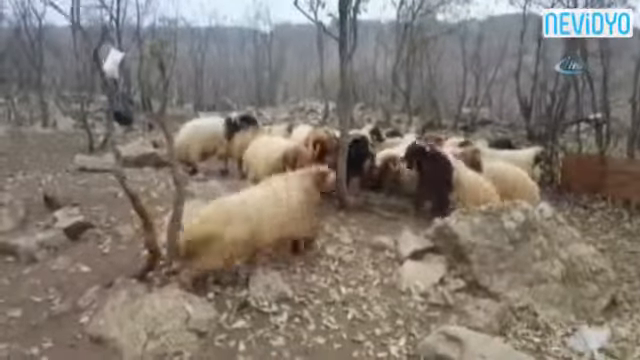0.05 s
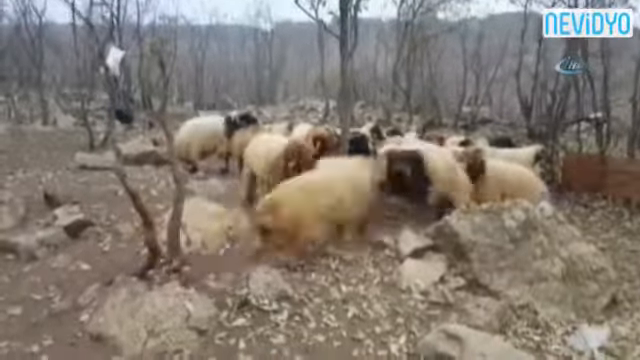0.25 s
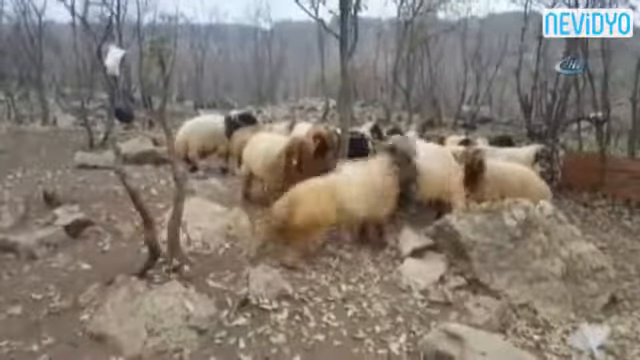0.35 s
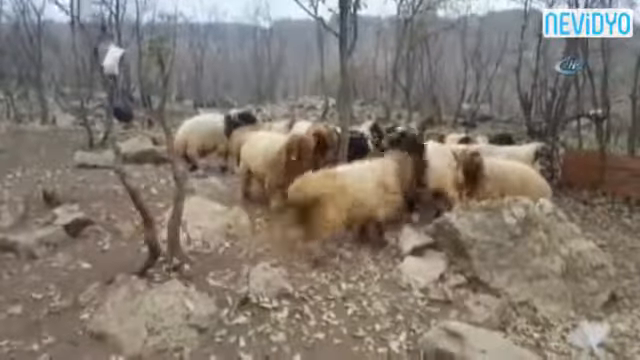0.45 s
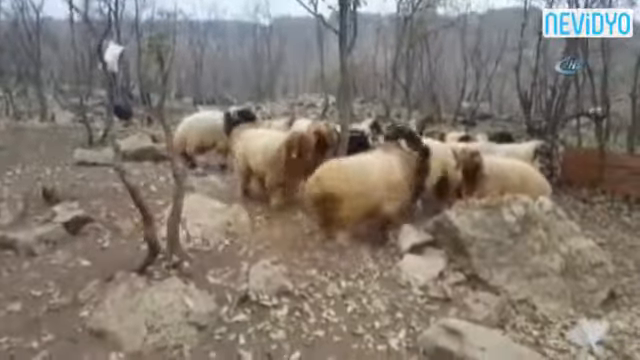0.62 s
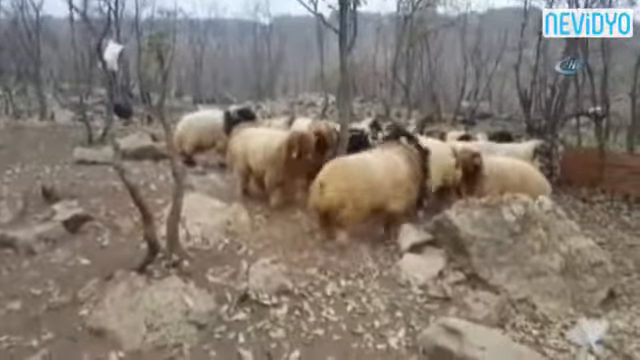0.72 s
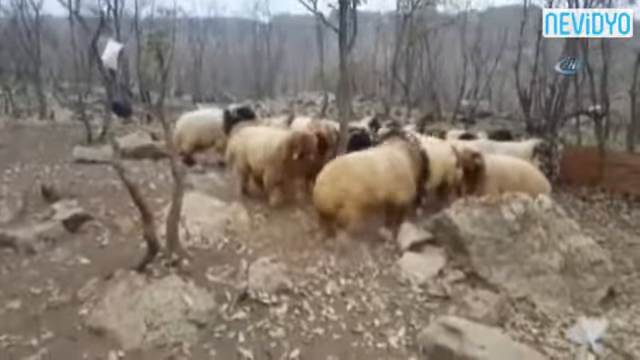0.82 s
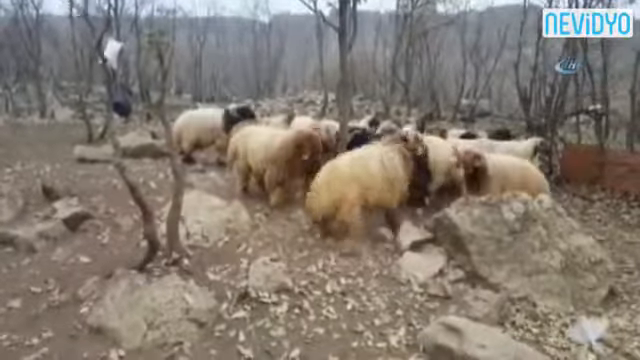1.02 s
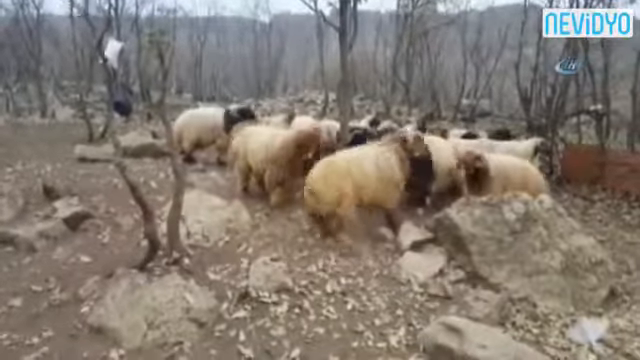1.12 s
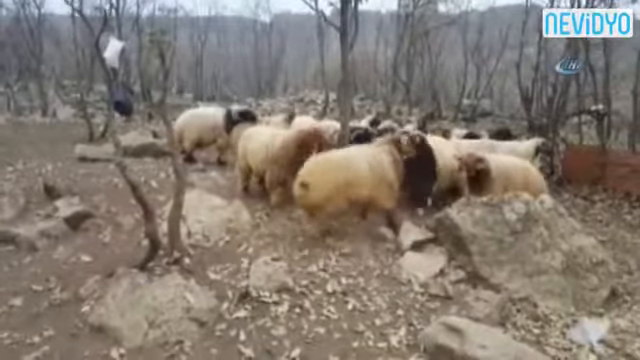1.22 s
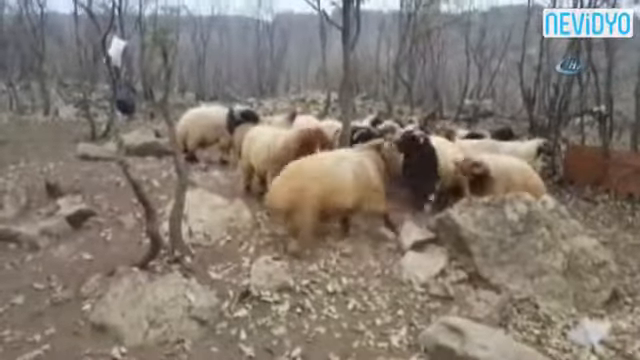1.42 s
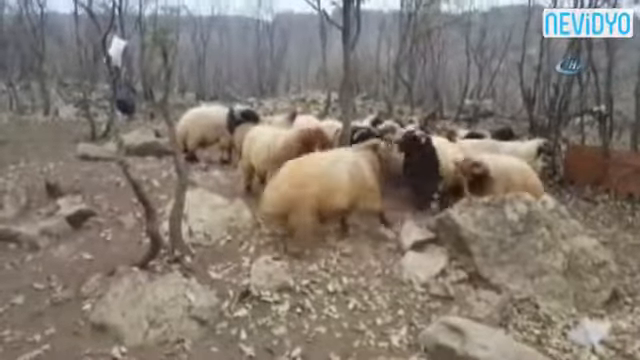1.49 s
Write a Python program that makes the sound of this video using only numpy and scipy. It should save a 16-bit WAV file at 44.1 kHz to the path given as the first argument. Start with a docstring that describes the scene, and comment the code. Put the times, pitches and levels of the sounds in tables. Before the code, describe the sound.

Rams butt horns with a hard clack as hooves scuff through dry leaves.

```python
"""Rams butting in a wood

A ram charges over dry leaves and butts another: scuffs, a hard clack of horns, a body thump.
Then the flock shuffles: hooves knock on the ground, leaves crackle and twigs snap,
over a low pulsing rumble, probably a ram's growl. A far bird chirps at the end."""
import sys
import numpy as np
from scipy import signal
from scipy.io import wavfile
from scipy.ndimage import uniform_filter1d

SR = 44100
rng = np.random.default_rng(int(sys.argv[2]) if len(sys.argv) > 2 else 0)


def inscribe(sig):
    """Save sig as 16-bit PCM at rate SR to the path in sys.argv[1].

    A 1-D sig is mono; a 2-D sig holds one channel per row.
    Samples are clipped to [-1, 1] before scaling.
    """
    pcm = np.round(np.clip(np.atleast_2d(sig).T, -1, 1) * 32767)
    wavfile.write(sys.argv[1], SR, pcm.astype(np.int16))


N = 68355
T = np.arange(N) / SR


def amp(db):
    """Turns decibels into a number to multiply by."""
    return 10 ** (np.asarray(db) / 20)


def unit(x):
    """Scales a sound to an average strength (rms) of 1."""
    return x / np.sqrt(np.mean(x ** 2) + 1e-20)


def add(mix, start_s, sound):
    """Adds a sound to the mix at the given time."""
    part = mix[max(round(start_s * SR), 0):][:len(sound)]
    part += sound[:len(part)]


def colour(x, points):
    """Shapes a sound's lows and highs to follow (f/Hz, level/dB) points, at strength 1."""
    hz, db = np.transpose(points)
    grid_hz = abs(np.fft.fftfreq(8192, 1 / SR)) + 1
    log_gain = np.log(amp(np.interp(np.log(grid_hz), np.log(hz), db)))
    response = np.exp(np.conj(signal.hilbert(log_gain)))  # rings after a click, never before
    taps = np.fft.ifft(response).real[:4096]
    return unit(signal.fftconvolve(x, taps)[:N])


def band(x, lo_hz, hi_hz):
    """Softly removes what lies below lo_hz and above hi_hz."""
    return signal.sosfilt(signal.butter(2, [lo_hz, hi_hz], 'band', fs=SR, output='sos'), x)


def hiss(t, lo_hz, hi_hz):
    """Noise between two frequencies, as long as t."""
    return unit(band(rng.standard_normal(len(t)), lo_hz, hi_hz))


def wobble(samples):
    """A random wander; smoothing over more samples makes it slower."""
    return unit(uniform_filter1d(rng.standard_normal(N), size=samples))


def swell(t, peak_s):
    """Rises to 1 at peak_s, then dies away."""
    return (t / peak_s * np.exp(1 - t / peak_s)) ** 1.42


def crackle(per_s, spread_db):
    """Tiny random breaks, a few much louder than the rest."""
    size = amp(spread_db * np.minimum(rng.exponential(1, N), 4))
    return unit(size * rng.choice([-1, 1], N) * (rng.random(N) < per_s / SR))


def air():
    """A faint, steady, low rush behind everything."""
    # tone of the rush: f/Hz, level/dB
    air_tone = [(20, -20), (60, 14.5), (160, 8), (350, -10), (1000, -9.5), (3000, -24), (8000, -49),
                (12500, -50), (14500, -58)]
    return amp(-60) * colour(rng.standard_normal(N), air_tone)


def leaves():
    """Dry leaves crunch under each sweeping hoof and crackle loosely as the flock stirs them."""
    # hoof sweeps: t/s, length/s, level/dB
    scuffs = [(0.064, 0.021, -65), (.141, 0.0073, -54), (.186, 0.012, -65), (0.208, 0.01, -40),
              (0.223, 0.026, -37.5), (0.261, 0.0051, -35), (.271, 0.016, -38.5), (.283, 0.0088, -35),
              (0.296, 0.026, -38.5), (0.312, 0.011, -47), (0.433, 0.0098, -39.5), (0.667, .004, -60),
              (0.68, 0.0057, -49), (0.916, 0.0083, -35.5), (1.162, 0.023, -50.5), (1.401, .018, -54),
              (1.414, 0.0093, -43.5)]
    # tone of the crunch: f/Hz, level/dB
    crunch_tone = [(40, -44), (150, -19), (350, -11.5), (600, -3.5), (1000, -3.5), (1950, -2.5), (3200, 2),
                   (4200, -5.5), (5600, 1.5), (6600, -7.5), (7800, 2), (10500, -9.5), (13000, -4),
                   (15000, -27)]
    # stirring of the fallen leaves: t/s, level/dB
    stir = [(0, -69.5), (.17, -68.5), (.23, -50.5), (.35, -44), (.48, -48.5), (.60, -47), (.70, -52),
            (.86, -51), (.96, -49.5), (1.05, -54), (1.14, -59), (1.21, -53.5), (1.31, -66), (1.39, -62.5),
            (1.44, -53.5), (1.52, -63.5), (1.55, -53)]
    # tone of the stirred leaves: f/Hz, level/dB
    rustle_tone = [(100, -2), (330, -6.5), (580, 1), (1600, -8.5), (3100, -3.5), (4100, -9), (5350, -3.5),
                   (6400, -11.5), (7800, -2), (10600, -14.5), (13000, -7.5), (15000, -40)]
    rise_s, fall_s = 0.0034, 0.0049
    sweeps = np.zeros(N)
    for start, length, db in scuffs:
        rise = np.clip((T - start) / rise_s, 0, 1)
        fall = np.exp(-np.maximum(T - start - length, 0) / fall_s)
        sweeps += amp(db) * rise * fall
    rustle = colour(crackle(per_s=5000, spread_db=5.5) + rng.standard_normal(N), rustle_tone)
    crunch = colour(crackle(per_s=18000, spread_db=3), crunch_tone)
    stir_db = np.interp(T, *np.transpose(stir))
    return sweeps * crunch + amp(stir_db) * rustle


def twigs():
    """Twigs and leaf stalks snap, each with a noisy crack and a short ring."""
    # snaps: t/s, level/dB, f/Hz
    snaps = [(0.0146, -38.5, 5430), (.024, -41.5, 8100), (.2775, -28, 1980), (0.283, -19, 6130),
             (0.315, -15, 3170), (.318, -17.5, 3380), (0.336, -25, 7550), (0.3404, -27, 7900),
             (0.545, -25, 8340), (.661, -34, 5100), (0.7232, -35, 2700), (.783, -26, 7430),
             (.840, -32, 7460), (.854, -29, 7400), (0.917, -14, 2355), (.9207, -26.5, 8870),
             (0.929, -24, 8150), (1.0235, -35, 7300), (1.169, -38.5, 3930), (1.1857, -36, 7770),
             (1.2035, -25, 8900), (1.2291, -38.5, 7400), (1.287, -40.5, 7280), (1.3454, -31.5, 8100)]
    crack_fade_s, ring_fade_s = 0.00098, 0.0016
    out, t = np.zeros(N), T[:SR // 50]
    for start, db, hz in snaps:
        crack = hiss(t, 0.56 * hz, min(2.1 * hz, 10800)) * np.exp(-t / crack_fade_s)
        ring = np.sin(2 * np.pi * hz * t) * np.exp(-t / ring_fade_s)
        add(out, start, amp(db) * (0.35 * crack + 0.44 * ring))
    return out


def hooves():
    """Hooves hit earth and stones: a quickly fading note with gritty noise around its pitch."""
    # hoof knocks: t/s, level/dB, f/Hz
    knocks = [(0.031, -52, 182), (.086, -46, 168), (.120, -47, 193), (0.142, -38.5, 183), (0.221, -47, 156),
              (.245, -39, 187), (0.3173, -22.5, 580), (0.323, -48, 98), (.401, -21, 710), (0.41, -32, 1310),
              (0.442, -36, 910), (.487, -49, 74.4), (0.532, -32.5, 1290), (0.577, -42, 1090),
              (.603, -38.5, 600), (.660, -35.5, 634), (.682, -33, 1120), (0.771, -41.5, 460),
              (.849, -39, 500), (0.9017, -31, 1230), (.906, -27.5, 607), (.918, -20.5, 1770),
              (.948, -36.5, 680), (.957, -38.5, 584), (.971, -40.5, 750), (1.0039, -29.5, 1050),
              (1.006, -40, 530), (1.423, -44.5, 574)]
    rise_s, fade_cycles = 0.00077, 3.03
    out, t = np.zeros(N), T[:SR // 10]
    for start, db, hz in knocks:
        grit = hiss(t, 0.55 * hz, 2.2 * hz)
        ring = np.sin(2 * np.pi * hz * t)
        loudness = np.minimum(t / rise_s, 1) * np.exp(-t * hz / fade_cycles)
        add(out, start, amp(db) * loudness * (0.43 * grit + 0.74 * ring))
    return out


def head_butt():
    """Horns crack together and ring; just after, they grind and the heavy bodies boom."""
    # ringing notes of the horns: f/Hz, level/dB, time to peak/s
    horn_notes = [(510, -21, 0.0026), (771, -10.5, 0.0016), (1282, -17, 0.002), (2550, -27, .0016),
                  (3320, -31, 0.0028), (5900, -32, 0.0007), (7320, -27.5, 0.00092), (9380, -38, 0.0011)]
    # booming notes of the bodies: f/Hz, level/dB, time to peak/s
    body_notes = [(64.6, -25.5, 0.015), (90.8, -31.5, 0.021), (143, -24, 0.0086), (211.6, -34, 0.0166),
                  (360, -39, 0.0078)]
    hit_s = 0.3815
    boom_s = hit_s + 0.005
    out, t = np.zeros(N), T[:SR // 4]
    for start, notes in (hit_s, horn_notes), (boom_s, body_notes):
        for hz, db, peak_s in notes:
            add(out, start, amp(db) * swell(t, peak_s) * np.sin(2 * np.pi * hz * t))
    crack = swell(t, peak_s=0.0012) * hiss(t, 1400, 5000)
    grind = swell(t, peak_s=0.015) * hiss(t, 372, 1260)
    add(out, hit_s, amp(-29) * crack)
    add(out, boom_s, amp(-35) * grind)
    return out


def growl():
    """Slow pulses and breath, muffled by a closed mouth; the throat rings at a wandering pitch."""
    # course of the growl: t/s, pulse rate/Hz, level/dB, throat f/Hz
    course = [(.52, 44.6, -81, 182), (.59, 45, -51, 187), (.67, 49.5, -47, 144), (.77, 47.5, -49, 144),
              (.82, 60, -48, 145), (.90, 45.7, -46.5, 152), (.95, 60, -47, 189), (1.0, 62.4, -45, 180),
              (1.045, 51, -46, 238), (1.09, 47.5, -48.5, 190), (1.155, 47.2, -48.5, 193),
              (1.19, 58, -47, 116), (1.251, 60.3, -47, 116), (1.29, 46, -51, 216),
              (1.381, 43.6, -46.5, 194), (1.46, 54, -56, 140), (1.55, 93, -79, 149)]
    # tone of the muffled voice: f/Hz, level/dB
    voice_tone = [(25, -53), (55, -3.5), (85, -4), (115, 3.5), (155, 2.5), (235, 3), (290, -9), (380, -18),
                  (800, -68.5)]
    times, *columns = np.transpose(course)
    pulse_hz, db, throat_hz = (np.interp(T, times, column) for column in columns)
    cycles = np.cumsum(pulse_hz * (1 + 0.028 * wobble(samples=700))) / SR
    pulses = unit(np.diff(np.floor(cycles), prepend=0))  # one click per cycle
    breath = 0.42 * rng.standard_normal(N)
    voice = colour(pulses - pulses.mean() + breath, voice_tone)
    # Slide the throat's pitch down to 0 Hz, smooth, and slide back: a narrow ring is left.
    ring_width_hz = 27
    slide = np.exp(2j * np.pi * np.cumsum(throat_hz) / SR)
    hold = np.exp(-np.pi * ring_width_hz / SR)
    ring = 2 * (slide * signal.lfilter([1 - hold], [1, -hold], voice / slide)).real
    return amp(db) * (T > times[0]) * unit(voice + 1.15 * ring)


def bird():
    """A far bird sings thin, wavering notes, barely above the leaves."""
    # chirps: t/s, length/s, f/Hz, level/dB
    chirps = [(1.45, .03, 5250, -60), (1.472, 0.013, 4620, -51.5), (1.485, 0.036, 4820, -56)]
    out = np.zeros(N)
    for start, length, hz, db in chirps:
        t = np.arange(0, length, 1 / SR)
        pitch_hz = hz * (1 + 0.06 * wobble(samples=80)[:len(t)])
        note = np.sin(2 * np.pi * np.cumsum(pitch_hz) / SR)
        add(out, start, amp(db) * np.sin(np.pi * t / length) * note)
    return out


def wood_echoes(x):
    """Trunks and rocks throw back many faint, dull echoes."""
    echoes_per_s, first_s, die_away_s = 1500, 0.008, 0.13
    t = T[:SR // 2]
    echoes = rng.standard_normal(len(t)) * (rng.random(len(t)) < echoes_per_s / SR)
    echoes *= (t > first_s) * amp(-60 * t / die_away_s)
    tail = band(echoes, 73, 2400) / np.linalg.norm(echoes)
    return amp(-17.5) * signal.fftconvolve(x, tail)[:N]


def scene():
    """All sits in the middle; only the highs of leaves and twigs spread a little left and right."""
    direct = leaves() + twigs() + hooves() + head_butt() + growl() + bird()
    middle = direct + wood_echoes(direct) + air()
    side = amp(-23) * band(leaves() + twigs(), 7500, 15000)
    return np.array([middle + side, middle - side])


def record(dry):
    """Cuts off the very highest sounds."""
    top_hz = 15300
    taps = signal.firwin(255, top_hz, window=("kaiser", 9), fs=SR)
    return signal.oaconvolve(dry, taps[None], "same")


dry = scene()
out = record(dry)
inscribe(out)
```